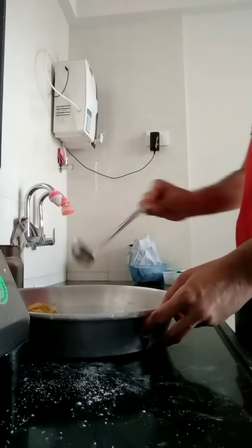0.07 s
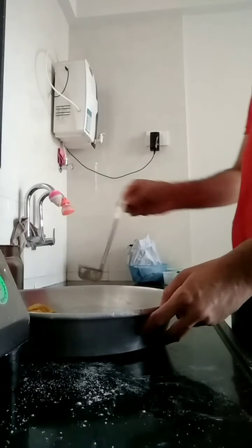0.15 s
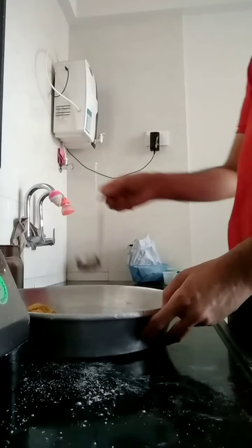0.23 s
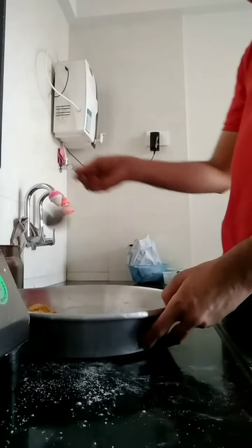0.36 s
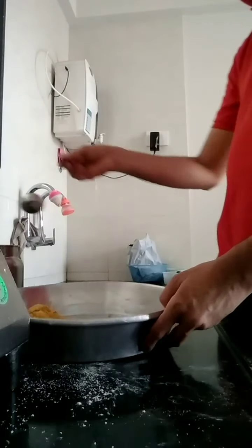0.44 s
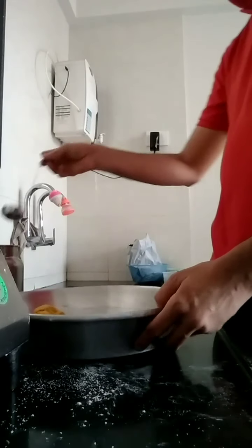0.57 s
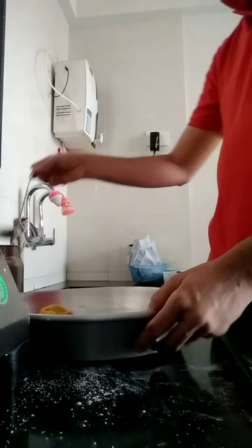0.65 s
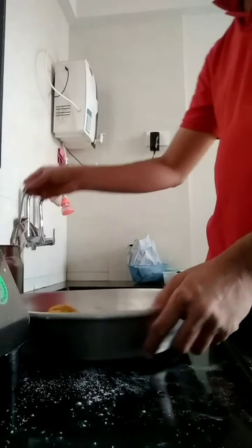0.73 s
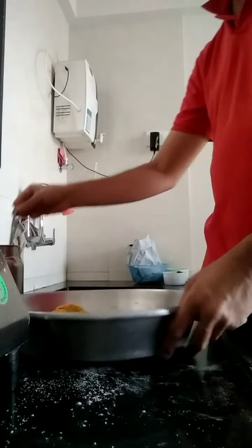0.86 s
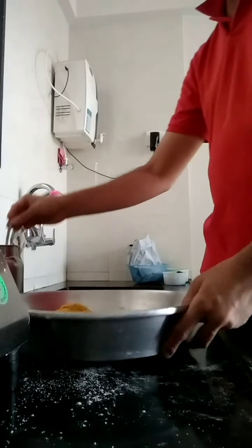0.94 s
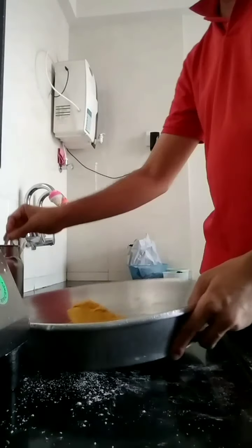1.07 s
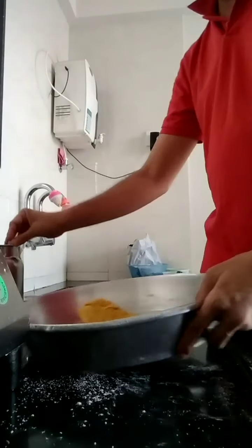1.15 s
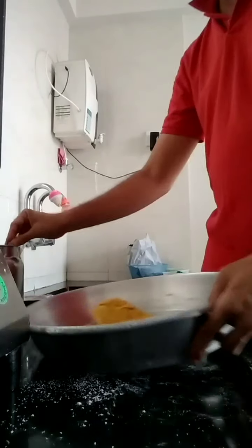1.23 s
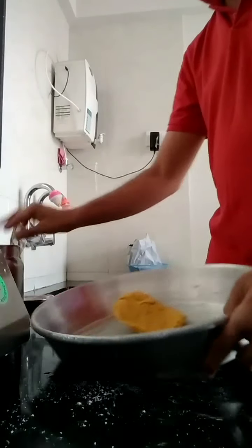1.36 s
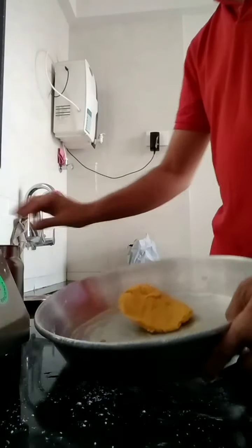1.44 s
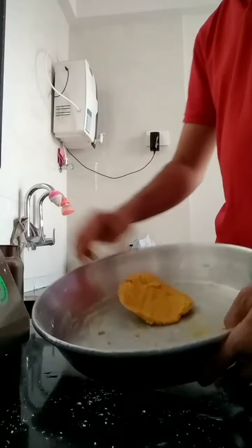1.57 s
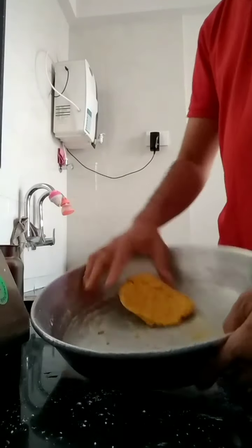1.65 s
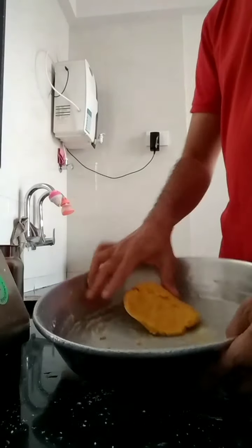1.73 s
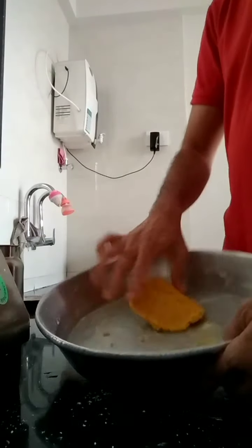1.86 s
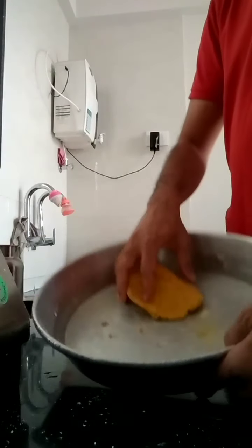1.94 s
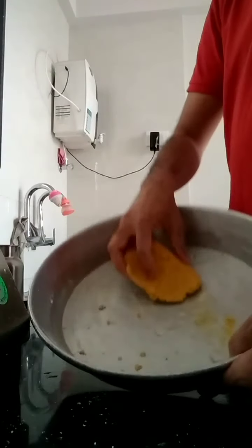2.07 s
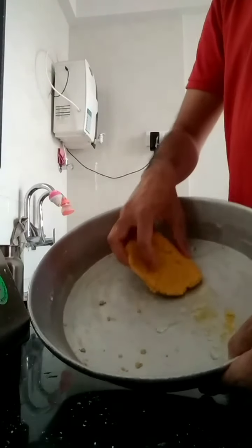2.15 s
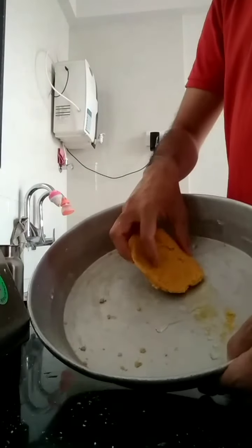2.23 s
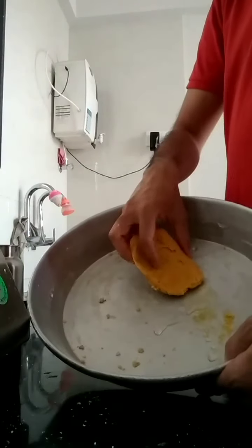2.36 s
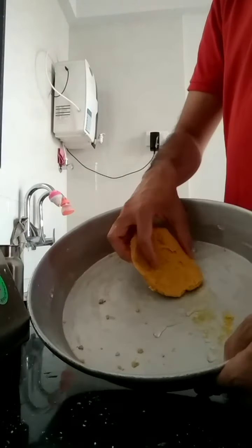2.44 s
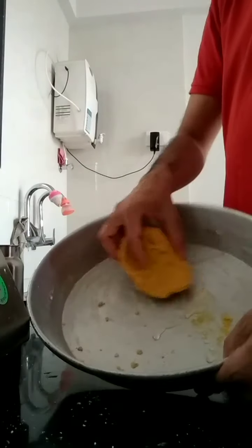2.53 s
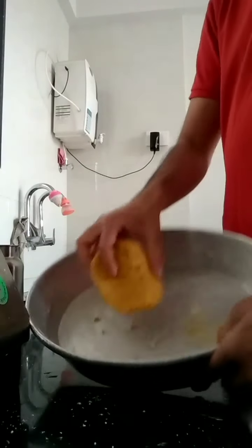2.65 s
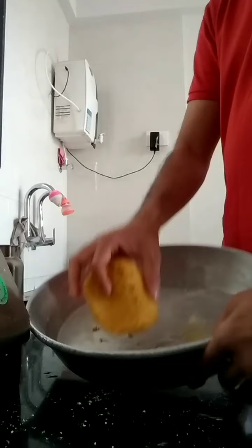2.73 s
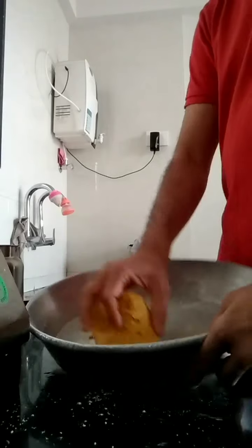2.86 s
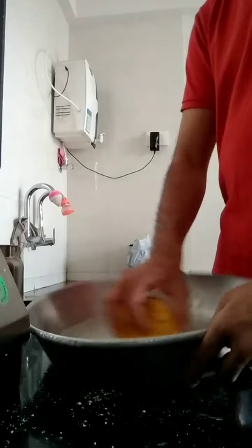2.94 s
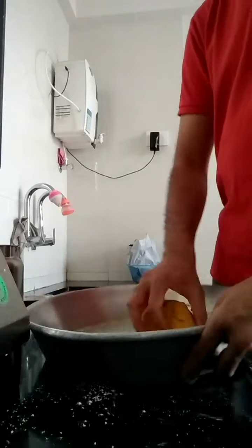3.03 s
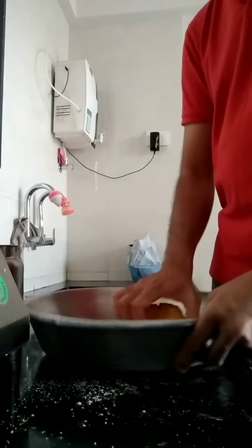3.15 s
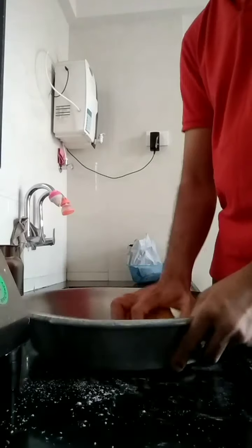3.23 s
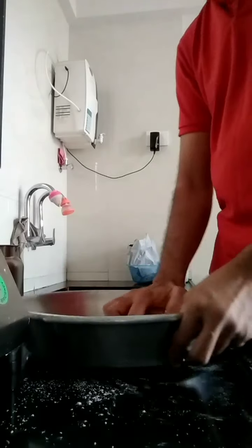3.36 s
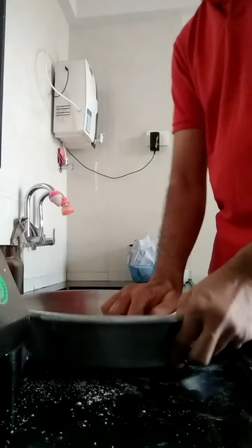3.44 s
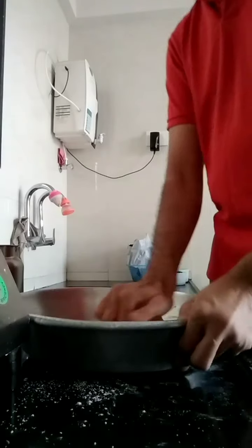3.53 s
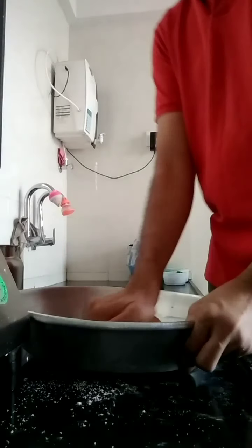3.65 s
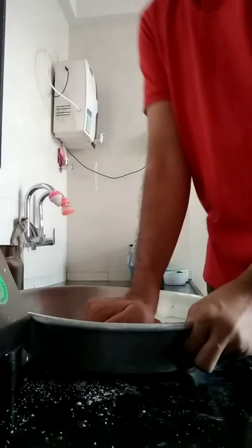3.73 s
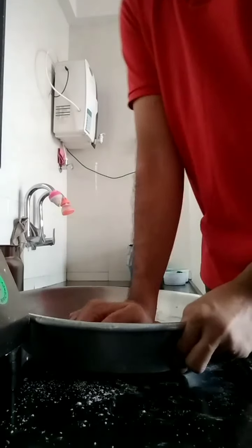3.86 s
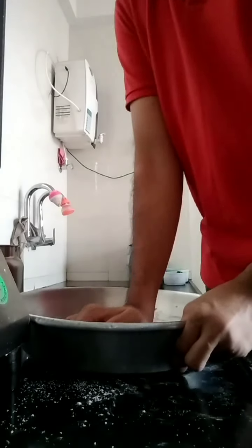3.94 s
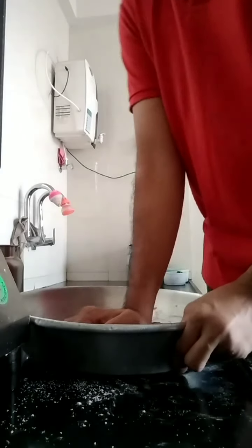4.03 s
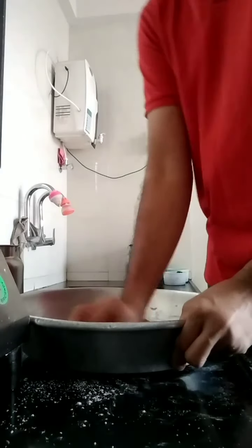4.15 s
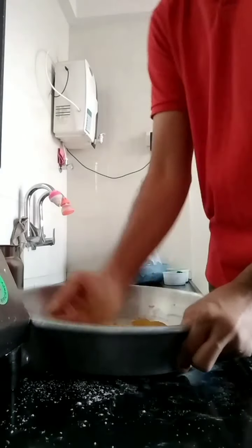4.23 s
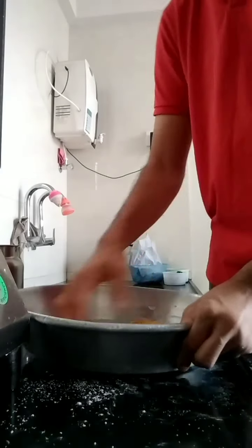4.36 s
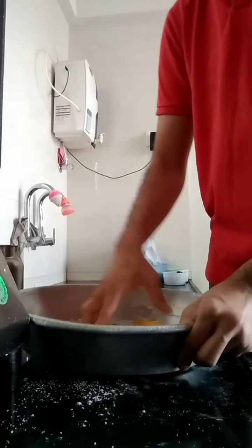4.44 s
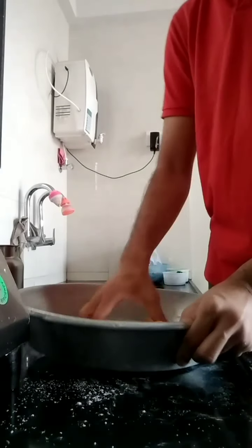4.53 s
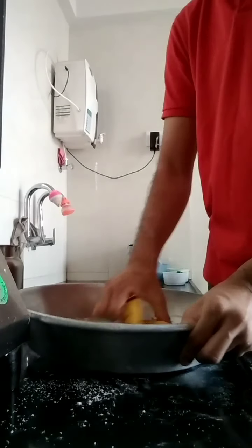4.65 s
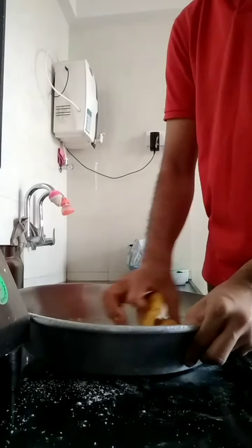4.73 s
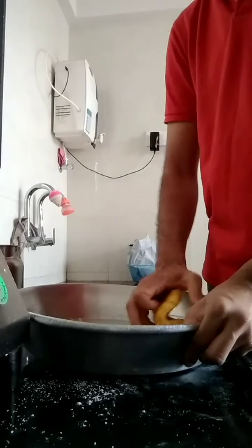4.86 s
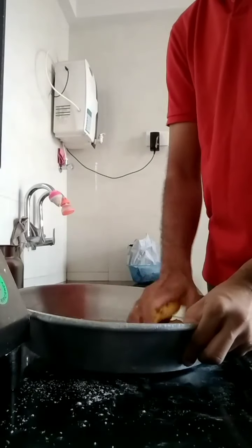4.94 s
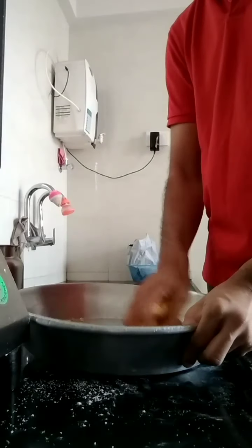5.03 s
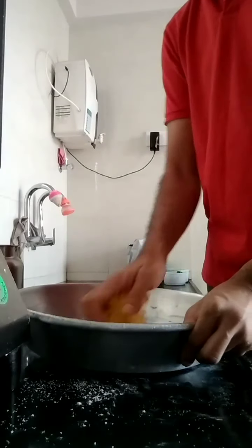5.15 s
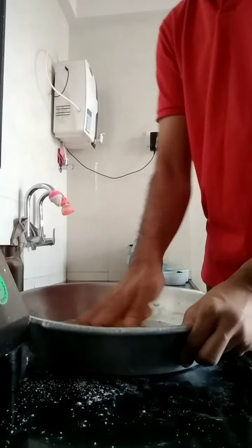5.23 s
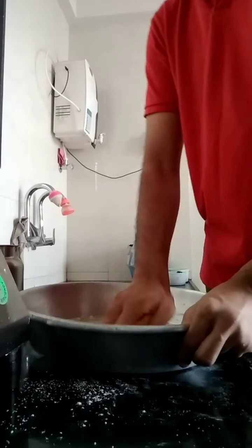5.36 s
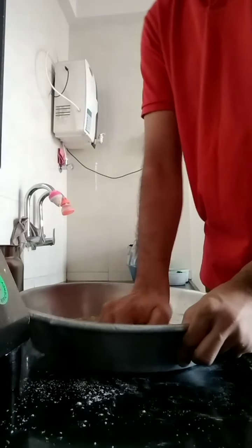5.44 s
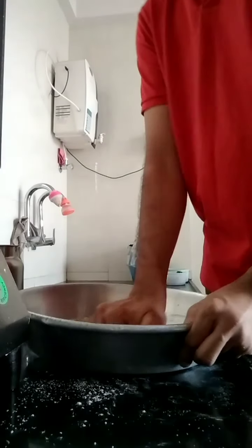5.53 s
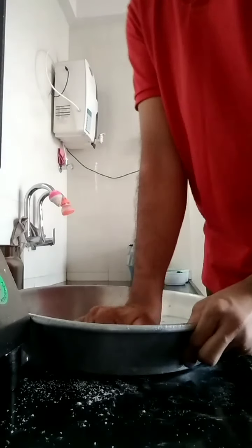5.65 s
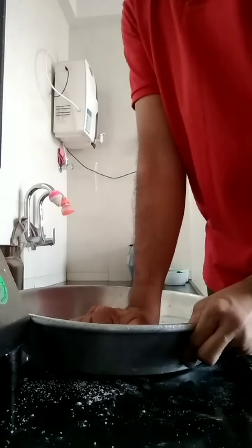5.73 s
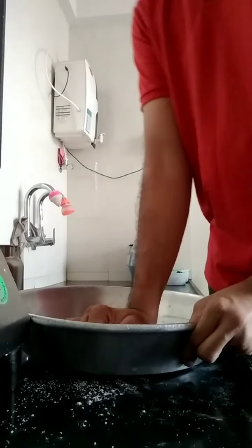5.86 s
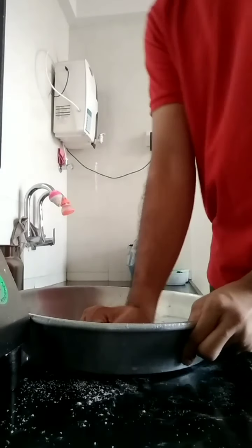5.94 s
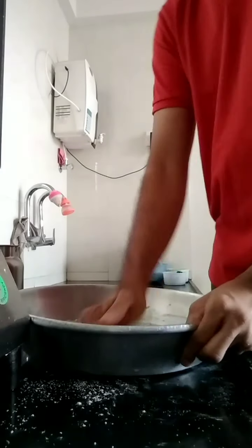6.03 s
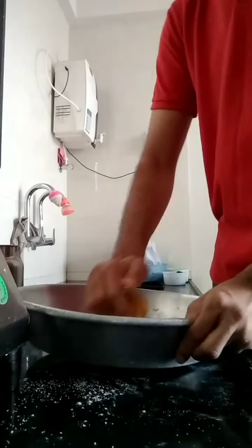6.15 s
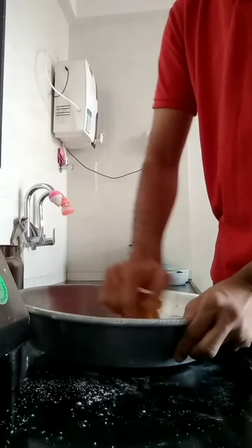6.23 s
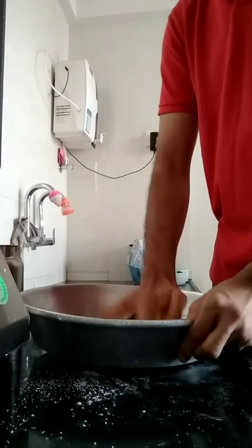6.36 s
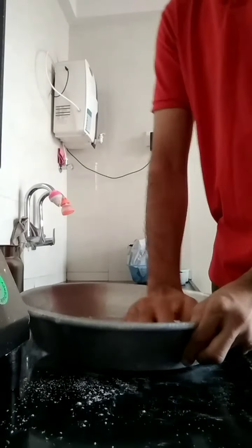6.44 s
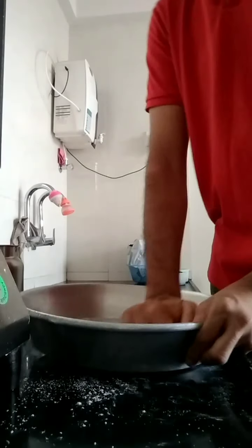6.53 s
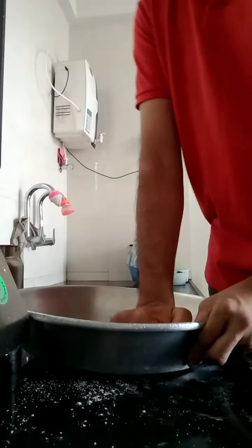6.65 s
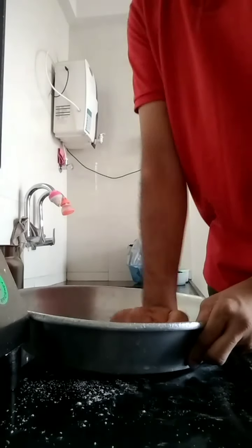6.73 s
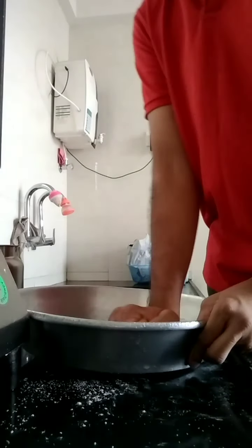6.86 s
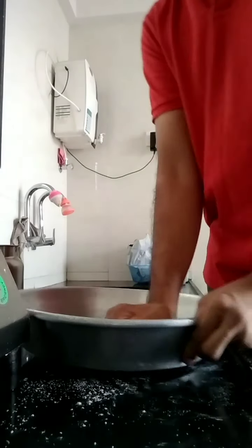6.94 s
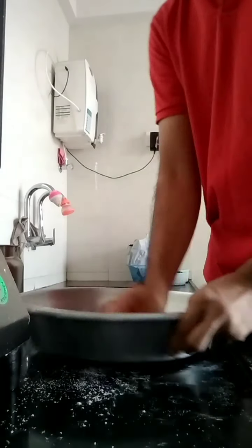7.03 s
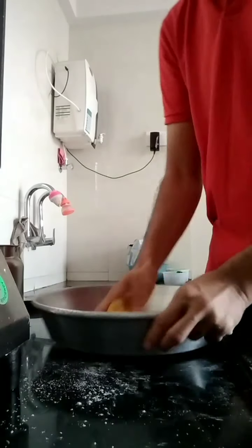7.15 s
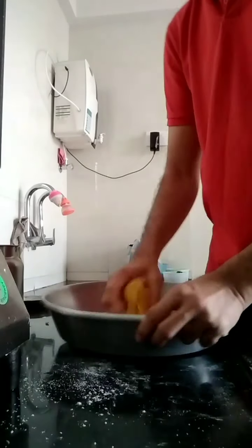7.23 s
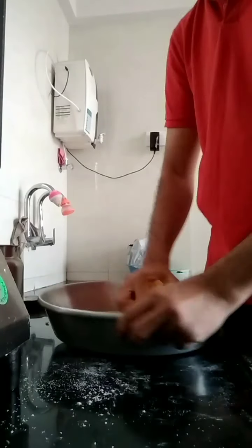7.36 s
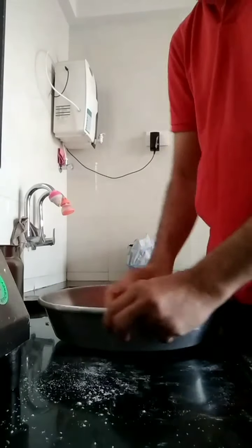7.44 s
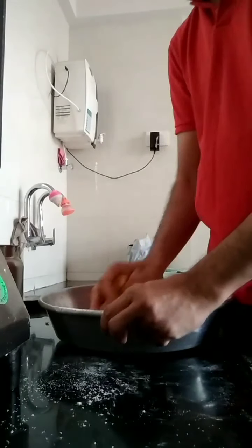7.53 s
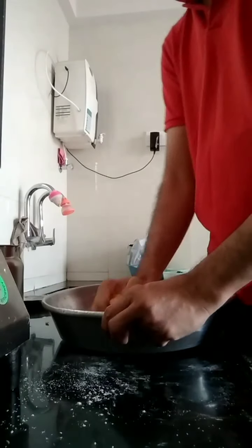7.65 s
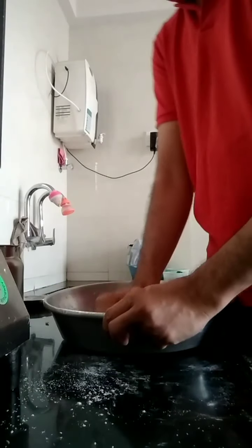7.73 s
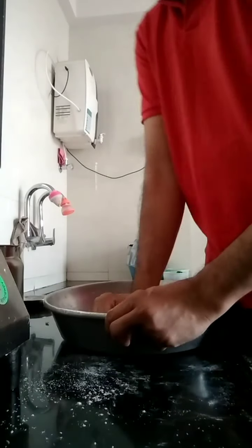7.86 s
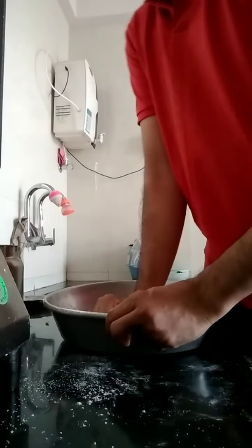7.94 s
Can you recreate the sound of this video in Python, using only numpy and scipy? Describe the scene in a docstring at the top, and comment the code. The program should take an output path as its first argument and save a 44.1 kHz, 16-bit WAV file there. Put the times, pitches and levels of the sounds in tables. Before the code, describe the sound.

A wide steel bowl knocks on stone, a ladle clinks, then dough is rubbed and pressed with squeaks, sticky snaps and two heavy metallic bangs.

```python
"""A wide steel bowl is knocked, rubbed and banged on a stone counter in a tiled kitchen; a ladle clinks early on.
A hand wipes a lump of dough round the bowl and leans on it until the steel bottom bangs on the stone.
Blows ring one set of damped modes plus a crack; the ladle beats in clusters of close modes; rubbing is
shaped noise and chirps; squeaks are gliding tones; slams, low thumps and snaps are bursts of coloured noise.
Decaying noise stands for the hard walls. Source levels are relative, ahead of the mix gains in scene()."""
import sys
import numpy as np
from scipy import signal
from scipy.fft import rfft, irfft
from scipy.io import wavfile
from scipy.ndimage import uniform_filter1d

SR = 44100
rng = np.random.default_rng(int(sys.argv[2]) if len(sys.argv) > 2 else 0)


def wav_record(signal):
    """Record a signal, one row per channel, as 16-bit PCM in the file named by sys.argv[1]."""
    frames = np.transpose(np.atleast_2d(signal))
    bounded = np.clip(frames, -1, 1)
    # unit amplitude maps onto the largest positive 16-bit level
    quanta = np.round(bounded * 32767).astype(np.int16)
    wavfile.write(sys.argv[1], SR, quanta)


N = 352359
T = np.arange(N) / SR
RING = T[:SR]  # one-second time axis of a single event


def undb(db):
    """Decibels to gain."""
    return 10 ** (np.asarray(db) / 20)


def unit(x):
    """Scale to rms 1."""
    return x / np.sqrt(np.mean(x ** 2))


def unit_hit(x):
    """Scale to the energy of 30 ms at rms 1."""
    return x / np.sqrt(np.sum(x ** 2) / (.03 * SR))


def fade(t60_s):
    """One second of exponential decay."""
    return np.exp(-np.log(1000) * RING / t60_s)


def onset(rise_s):
    """Exponential approach to full strength."""
    return 1 - np.exp(-RING / rise_s)


def colour(x, points):
    """Zero-phase filter by a spectrum of (frequency [Hz], level [dB]) points."""
    hz, db = np.transpose(points)
    f = np.fft.rfftfreq(x.shape[-1], 1 / SR)
    gain = undb(np.interp(np.log(f + 1), np.log(hz), db))
    return irfft(rfft(x) * gain, x.shape[-1])


def cut(x, hz, kind, order=3):
    """Causal high-pass or low-pass."""
    sos = signal.butter(order, min(hz, .45 * SR), kind, fs=SR, output="sos")
    return signal.sosfilt(sos, x)


def slow_noise(rate_hz):
    """Smoothed random steps at rate_hz, rms 1."""
    k = int(SR / rate_hz)
    steps = np.repeat(rng.standard_normal(N // k + 1), k)
    return unit(uniform_filter1d(steps, k)[:N])


def diffuse(size, apart_hz=1500):
    """Noise at two close microphones: alike in the bass, unrelated in the treble."""
    mid, side = rfft(rng.standard_normal((2, size)))
    angle = np.pi / 4 * np.tanh(np.fft.rfftfreq(size, 1 / SR) / apart_hz + .05)
    return irfft(np.cos(angle) * mid + np.sin(angle) * np.array([side, -side]), size)


def ports(x, lag_s=.00009):
    """Direct sound reaches the right microphone a moment before the left."""
    return np.array([np.interp(T - lag_s, T, x), x])


def add(track, s, sound):
    """Mix a sound into a track at s seconds."""
    i = int(s * SR)
    track[..., i:i + sound.shape[-1]] += sound[..., :track.shape[-1] - i]


def even(x, size=50):
    """Level out the chance peaks and dips in a noise's spectrum."""
    spectrum = rfft(x)
    power = uniform_filter1d(abs(spectrum) ** 2, size=size)
    return irfft(spectrum / np.sqrt(power), x.shape[-1])


def burst(points, decay_s):
    """A decaying rush of countless modes: noise with a smooth spectrum, faded twice."""
    noise = even(rng.standard_normal(len(RING)) * fade(decay_s))
    return colour(noise, points) * fade(4 * decay_s)


def bounces(gap_s, loss_db, t60_s, count=7):
    """Strength of a rattling contact: a first touch, then generally weaker ones at uneven intervals."""
    out, start_s, size = np.zeros(len(RING)), 0, 1
    for k, (gap, strength) in enumerate(rng.random((count, 2))):
        add(out, start_s, size * fade(t60_s))
        start_s += gap_s * (.5 + gap)
        size = undb(loss_db * (k + 2)) * (.5 + strength)
    return out


def rattle(points, contact):
    """Noise of many high modes with a smooth spectrum, excited as strongly as the contact goes."""
    noise = even(rng.standard_normal(len(RING)) * contact)
    return colour(noise, points) * np.clip(2 - 10 * RING, 0, 1)  # gone by 0.2 s


def ring(modes, weights, spread_s, bend=0, bend_s=0.085):
    """Decaying modes; bending waves bring each in at its own moment, and flexing bends their pitch."""
    out = 0
    for (hz, db, t60_s), weight in zip(modes, weights):
        age_s = np.maximum(RING[:SR // 2] - spread_s * rng.random(), 0)
        shift_s = bend * rng.uniform(-1.08, 1) * bend_s * (1 - np.exp(-age_s / bend_s))
        tone = np.sin(2 * np.pi * hz * (age_s + shift_s))
        decay = np.exp(-np.log(1000) * age_s / t60_s)
        out = out + weight * undb(db) / np.sqrt(t60_s) * tone * decay  # db is a mode's energy
    return np.pad(out, (0, len(RING) - len(out)))


def wander(x, depth_db, width_hz, hold_s, size=512):
    """Resonances about width_hz wide that swell and give way to others every hold_s."""
    spectra = signal.stft(x, nperseg=size)[2]
    field = rng.standard_normal(spectra.shape[-2:])
    for axis, cells in enumerate([width_hz * size / SR, hold_s * 2 * SR / size]):
        bell = np.exp(-(np.arange(-20, 21) / cells * 2) ** 2)
        field = np.apply_along_axis(np.convolve, axis, field, bell, "same")
    gain = undb(depth_db * np.tanh(unit(field) / 2) * 2)
    return unit(signal.istft(spectra * gain, nperseg=size)[1][..., :N])


def quiet_kitchen(level_db=-65):
    """Steady diffuse background noise whose level drifts slowly."""
    # background spectrum: (frequency [Hz], density [dB])
    background_points = [(15, -49.5), (25, -8.5), (76, -1), (145, -7), (185, -9), (326, -8.5), (439, -4),
                         (659, -18), (1160, -12), (1370, -32), (1560, -20.5), (1840, -28.5), (2910, -29.5),
                         (3340, -35), (16000, -46.5)]
    noise = unit(colour(diffuse(N), background_points))
    return undb(level_db) * noise * undb(.5 * slow_noise(4.2))


def kitchen(x, first_wall_s=0.00037):
    """Dense reflections from tiles: diffuse noise, each frequency band dying at its own rate."""
    # room: (frequency [Hz], t60 [s], reverberant energy relative to direct [dB])
    room_bands = [(70.4, 0.57, -0.5), (196, 0.57, -9), (490, 0.54, -8.5), (1470, 0.61, -8.5),
                  (2800, 0.7, -0.5), (5350, 0.56, -5), (10400, 0.46, -1.5), (16000, 0.34, -6)]
    hz, t60_s, wet_db = np.transpose(room_bands)
    noise = rfft(diffuse(len(RING)))
    f = np.log(np.fft.rfftfreq(len(RING), 1 / SR) + 1)
    tail = 0
    for band, band_t60_s in zip(np.eye(len(hz)), t60_s):
        tail = tail + irfft(noise * np.interp(f, np.log(hz), band)) * fade(band_t60_s)
    tail = colour(even(tail), list(zip(hz, wet_db)))  # many overlapping room modes share the energy evenly
    tail *= np.clip(RING / first_wall_s - .5, 0, 1) * np.clip(4 * (1 - RING), 0, 1)
    return signal.fftconvolve(np.atleast_2d(x), tail, axes=1)[:, :N]


def squeaks(waver=0.05, flutter_db=6):
    """Rim and fingers squeak as they slide: stick-slip tones with unsteady pitch and strength."""
    # squeaks: (time [s], length [s], start pitch [Hz], end pitch [Hz], level [dB])
    squeak_events = [(0.208, 0.079, 1183, 1223, -62.5), (.41, 0.044, 1155, 1114, -61),
                     (0.585, 0.16, 1600, 1555, -61), (0.724, 0.058, 1560, 1645, -52.5),
                     (3.241, 0.082, 1540, 1400, -51), (3.336, 0.032, 1383, 1480, -48.5),
                     (6.451, 0.043, 1635, 1570, -44.5), (7.5, 0.059, 1507, 1575, -46.5)]
    out, drift, flutter = np.zeros(N), slow_noise(260), undb(flutter_db * slow_noise(70))
    for s, length_s, start_hz, end_hz, db in squeak_events:
        span = slice(int(s * SR), int((s + length_s) * SR))
        u = np.linspace(0, 1, len(T[span]))
        hz = (start_hz + (end_hz - start_hz) * u) * (1 + waver * drift[span])
        tone = np.sin(2 * np.pi * np.cumsum(hz) / SR)
        add(out, s, undb(db) * unit(tone * np.sin(np.pi * u) * flutter[span]))
    return out


def ladle(chatter_db=-7.5, chatter_t60_s=0.0095, spread_s=0.011, push_s=0.00071, count=10):
    """The ladle bounces to rest: clusters of close modes beat against each other over a metallic chatter."""
    # touches: (time [s], level [dB], part that touches, nominal t60 [s])
    touches = [(0.783, -40, "handle", 0.022), (1.214, -26.5, "handle", 0.026), (1.463, -22.5, "cup", 0.12),
               (1.512, -29.5, "cup", 0.087)]
    # mode clusters by part: (centre [Hz], width [Hz], energy [dB])
    clusters = {"handle": [(2060, 390, -23), (2730, 120, -28.5), (3570, 600, -19.5), (4050, 120, -24),
                (4750, 160, -13), (5170, 300, -6.5), (5670, 200, -8), (5760, 160, -12), (6820, 290, -7.5),
                (7200, 350, -18), (8200, 160, -14.5), (8250, 60, -13), (9170, 310, -1), (9900, 150, -8),
                (10700, 320, -2.5), (11750, 550, -0.5), (12700, 600, -4.5), (13050, 200, -18),
                (13400, 450, -5), (15660, 120, -16)], "cup": [(477, 450, -3.5), (822, 230, -7.5),
                (1163, 49, -4.5), (1294, 150, -6.5), (1576, 62, 0.5), (2040, 310, -10.5),
                (2350, 300, -12.5), (2744, 290, -8), (3395, 360, -7.5), (4210, 200, -9.5), (4900, 290, -8),
                (5200, 370, -10), (5647, 130, -7), (6600, 520, -9), (7080, 410, -7.5), (7760, 270, -15),
                (8450, 250, -15), (9330, 580, -3), (10170, 44, -4), (10550, 700, -7), (11100, 330, -12),
                (12900, 1000, -1.5), (13715, 60, 2), (13600, 960, -2.5), (14550, 500, -2.5),
                (15550, 300, -15)]}
    # chatter spectrum: (frequency [Hz], level [dB])
    chatter_points = [(1000, 1.5), (4000, -13), (13500, 12), (15500, -9)]
    out = np.zeros(N)
    for s, db, part, t60_s in touches:
        modes = []
        for centre_hz, width_hz, mode_db in clusters[part]:
            for k in range(count):
                hz = centre_hz + width_hz * ((k + rng.random()) / count - .5)
                modes.append((hz, mode_db, t60_s * (.5 + rng.random())))
        contact = bounces(gap_s=.009, loss_db=-5, t60_s=chatter_t60_s)
        tones = unit_hit(ring(modes, np.ones(len(modes)), spread_s))
        clink = tones + undb(chatter_db) * unit_hit(rattle(chatter_points, contact))
        lowest_hz = clusters[part][0][0]
        add(out, s, undb(db) * unit_hit(cut(clink * onset(push_s), lowest_hz, "high")))
    return out


def stroke_strength(length_s, attack_s, ease_db_per_s, release_db_per_s):
    """Strength of one stroke: a smooth rise, a sagging hold and a release."""
    age_s = RING - attack_s
    hold_db = ease_db_per_s * np.clip(age_s, 0, length_s)
    release_db = release_db_per_s * np.maximum(age_s - length_s, 0)
    return np.minimum(RING / attack_s, 1) ** 2 * undb(-hold_db - release_db)


def dough_slips(per_s=900, cycles=8, scatter_db=3.5, glide=0.088):
    """Sticky dough lets go in little jerks, each a short gliding chirp of the bowl's wall."""
    out = np.zeros(N)
    for when, pitch, size, bend in rng.random((int(per_s * N / SR), 4)):
        hz = 80 + 2400 * pitch
        age = RING[:int(4 * cycles / hz * SR)] * hz / cycles  # in units of `cycles` periods
        chirp = np.sin(2 * np.pi * cycles * age * (1 + glide * (bend - .5) * age)) * np.sqrt(hz)
        strength = undb(-scatter_db * np.log(size + 0.015))
        add(out, when * T[-1], strength * age * np.exp(-age * 2) * chirp)
    return out


def rubbing(grain_db=1, slip_db=2, hiss_gain_db=1, crackle_per_s=320, crackle_scatter_db=3.0, crackle_db=-7.5):
    """Skin hisses over steel, dough crackles as it peels and drags in jerks; returns hiss and drag."""
    # strokes of palm and dough: (time at full speed [s], length [s], skin hiss [dB], dough drag [dB])
    strokes = [(0.677, 0.04, -62, -78.5), (0.744, 0.04, -54.5, -69.5), (0.807, 0.012, -60, -73),
               (0.909, 0.098, -52.5, -88.5), (1.081, 0.23, -54, -58.5), (1.13, 0.17, -63, -45),
               (1.393, 0.2, -59, -56), (1.666, 0.13, -50.5, -57.5), (2.02, 0.076, -69.5, -93),
               (2.096, 0.0061, -44.5, -40.5), (2.478, 0.0049, -68, -82), (2.59, 0.063, -70.5, -67),
               (3, 0.062, -47, -46.5), (3.108, 0.15, -43.5, -47), (3.297, 0.072, -57.5, -78),
               (3.421, 0.078, -68, -76.5), (3.572, 0.015, -72, -58.5), (3.757, 0.015, -52.5, -48.5),
               (3.905, 0.022, -102.5, -64), (4.02, 0.052, -71.5, -60), (4.239, 0.031, -63, -61),
               (4.344, 0.028, -60.5, -54), (4.521, 0.026, -48.5, -50.5), (4.544, 0.07, -61.5, -48),
               (4.671, 0.0059, -35, -40), (4.813, 0.086, -82, -55.5), (4.945, 0.048, -59, -68.5),
               (5.043, 0.16, -46, -52), (5.282, 0.054, -50.5, -45.5), (5.367, 0.021, -48.5, -68),
               (5.626, 0.1, -55.5, -56), (6.059, 0.15, -54.5, -46), (6.242, 0.095, -59.5, -63),
               (6.346, 0.083, -67, -55), (6.489, 0.056, -45.5, -45), (6.598, 0.065, -52, -77.5),
               (6.935, 0.11, -49.5, -44.5), (7.106, 0.13, -44.5, -52.5), (7.29, 0.052, -48.5, -54),
               (7.417, 0.058, -52.5, -55.5), (7.524, 0.076, -53.5, -51.5), (7.662, 0.064, -58, -72),
               (7.947, 0.036, -70, -64.5)]
    # skin hiss spectrum: (frequency [Hz], level [dB])
    hiss_points = [(1300, -36), (2200, -29.5), (2700, -17.5), (3300, -3), (4300, -2), (5300, 3),
                   (7000, 0.5), (8500, 4), (10500, 8.5), (12500, 4.5), (14700, 6.5), (16000, 0.5)]
    # dough drag spectrum: (frequency [Hz], level [dB])
    drag_points = [(60, 2), (120, -17.5), (260, -13), (400, -17.5), (530, -6), (740, 0), (900, -3),
                   (1060, -1), (1250, -3), (1540, -4.5), (1780, -22), (2050, -7), (2500, -18.5),
                   (3400, -22.5)]
    hiss_attack_s, hiss_ease_db_per_s, hiss_release_db_per_s = 0.067, 9, 281
    drag_attack_s, drag_ease_db_per_s, drag_release_db_per_s = 0.068, 41.5, 303.5
    hiss_level, drag_level = np.zeros(N), np.zeros(N)
    for s, length_s, hiss_db, drag_db in strokes:
        palm = stroke_strength(length_s, hiss_attack_s, hiss_ease_db_per_s, hiss_release_db_per_s)
        lump = stroke_strength(length_s, drag_attack_s, drag_ease_db_per_s, drag_release_db_per_s)
        add(hiss_level, s - hiss_attack_s, undb(hiss_db) * palm)
        add(drag_level, s - drag_attack_s, undb(drag_db) * lump)
    skin = unit(diffuse(N) * undb(grain_db * slow_noise(1500)))
    ticks = rng.random(N) < crackle_per_s / SR
    crackle = unit(ticks * undb(crackle_scatter_db * rng.standard_normal(N)))
    friction = (skin + undb(crackle_db) * ports(crackle)) * undb(slip_db * slow_noise(49))
    # broad resonances in hiss and drag swell and fade at random
    hiss = wander(colour(friction, hiss_points), depth_db=4.5, width_hz=160, hold_s=0.049)
    drag = wander(colour(dough_slips(), drag_points), depth_db=4.5, width_hz=140, hold_s=0.04)
    return hiss * hiss_level * undb(hiss_gain_db), drag * drag_level


def thumps_and_snaps(thump_decay_s=0.22, thump_rise_s=0.003, snap_gap_s=0.0045, snap_loss_db=-3.5, snap_t60_s=0.0078):
    """Dull low noise bursts, and sticky dough snapping off steel or fingers in short tick runs; returns both."""
    # low thumps: (time [s], level [dB])
    thump_events = [(1.105, -42), (1.79, -51.5), (3.079, -44.5), (5.279, -48)]
    # thump spectrum: (frequency [Hz], level [dB])
    thump_points = [(40, -23.5), (75, -1.5), (115, 3.5), (170, -13), (300, -21), (800, -60)]
    # snaps of sticky dough: (time [s], level [dB])
    snap_events = [(2.451, -55.5), (2.612, -65), (2.688, -57), (3.081, -49), (3.555, -59.5), (3.748, -54),
                   (4.465, -57.5), (4.505, -57), (4.925, -61.5), (5.06, -51), (5.354, -46), (6.205, -54.5),
                   (6.299, -51.5), (6.322, -51.5), (6.415, -56.5), (6.549, -46), (7.096, -42), (7.308, -37)]
    # snap spectrum: (frequency [Hz], level [dB])
    snap_points = [(600, -27.5), (1500, -3.5), (2300, -8.5), (3300, 0.5), (6000, -6), (10500, 6.5),
                   (15000, 5)]
    thumps, snaps = np.zeros(N), np.zeros(N)
    for s, db in thump_events:
        add(thumps, s, undb(db) * unit_hit(burst(thump_points, thump_decay_s) * onset(thump_rise_s)))
    for s, db in snap_events:
        contact = bounces(snap_gap_s, snap_loss_db, snap_t60_s)
        add(snaps, s, undb(db) * unit_hit(rattle(snap_points, contact)))
    return thumps, snaps


def slams(clap_gap_s=0.0016, clap_loss_db=-2.0, clap_t60_s=0.014,
          rock_after_s=0.02, rock_gap_s=0.016, rock_loss_db=-2, rock_db=-12,
          thud_decay_s=0.21, thud_rise_s=0.0026):
    """The bowl's edge, then twice its flat bottom, claps on stone and rattles; returns clap and low thud."""
    # slams: (time [s], clap [dB], thud [dB])
    slam_events = [(2.0903, -18.5, -28), (5.67, -14, -20.5), (6.6616, -13.5, -16)]
    # clap spectrum: (frequency [Hz], level [dB])
    clap_points = [(200, -11), (480, 1), (850, -28), (1075, 11.5), (1260, -2), (1450, 2), (1580, 8.5),
                   (1730, -17.5), (1920, -7.5), (2170, -8), (2400, -27.5), (6000, -22), (15000, -36)]
    # thud spectrum: (frequency [Hz], level [dB])
    thud_points = [(45, -31), (62, -7.5), (78, 2), (115, -6.5), (155, -4), (195, 7.5), (300, -5.5),
                   (480, -1.5), (800, -4.5), (2000, -47.5)]
    clap, thud = np.zeros(N), np.zeros(N)
    for s, clap_db, thud_db in slam_events:
        contact = bounces(clap_gap_s, clap_loss_db, clap_t60_s)
        rocking = bounces(rock_gap_s, rock_loss_db, clap_t60_s)
        add(contact, rock_after_s, undb(rock_db) * rocking)
        add(clap, s, undb(clap_db) * unit_hit(rattle(clap_points, contact)))
        add(thud, s, undb(thud_db) * unit_hit(burst(thud_points, thud_decay_s) * onset(thud_rise_s)))
    return clap, cut(thud, 62, "high", order=4)


def bowl(crack_decay_s=0.032, spread_s=0.007066, place_width=0.14, push_cycles=4,
         crack_reach=3.5, detune=0.0053, lowest_hz=58, flex=0.007):
    """Each blow drives a band of the bowl's modes, favours some by the place struck, and adds a crack."""
    # blows: (time [s], level [dB], lowest driven [Hz], highest driven [Hz],
    #         favoured by the place struck [Hz], its boost [dB], contact crack relative to body [dB])
    blows = [(.121, -53.5, 880, 1660, 1074, 6, -35), (.555, -41.5, 340, 570, 497, 25, -24),
             (.80, -44, 258, 430, 383, 17, -42), (1.129, -13.5, 326, 980, 520, 16.5, -64),
             (1.143, -17.5, 437, 885, 504, 17.5, -63), (1.65, -29, 304, 1340, 399, 11.5, -15),
             (1.677, -34.5, 292, 640, 422, 9, -45), (1.712, -39.5, 500, 1300, 1150, 24, -30),
             (1.75, -49, 390, 1390, 1080, 18, -24), (1.832, -66, 330, 560, 438, 15, -45),
             (1.996, -48.5, 495, 880, 735, 13, -69), (2.0887, -17.5, 170, 1500, 647, 8.5, -18),
             (2.146, -22, 337, 530, 445, 22, -50), (2.30, -41, 364, 540, 450, 24, -48),
             (2.385, -45, 360, 540, 445, 26, -52.5), (2.612, -50.5, 335, 1000, 386, 9, -11.5),
             (2.684, -38, 536, 1740, 660, 11.5, -16), (2.76, -48, 306, 850, 340, -5, -39),
             (2.906, -23, 500, 935, 690, 10, -32.5), (2.909, -27.5, 355, 600, 447, 27, -57),
             (2.985, -29, 393, 550, 446, 27, -46), (3.078, -34, 467, 1400, 704, 5, -13),
             (3.703, -40, 430, 1990, 515, 14, -9.5), (3.747, -42.5, 420, 1880, 596, 12, -15),
             (4.194, -51.5, 324, 905, 400, 6.5, -12), (4.316, -43, 690, 1140, 850, 25, -41),
             (4.389, -41, 630, 1140, 720, 19, -30), (4.477, -44, 610, 905, 690, 23, -35),
             (4.51, -41, 600, 1400, 770, 22, -37), (4.658, -30, 700, 2000, 1230, 10.5, -6),
             (4.84, -46, 298, 700, 377, 24, -42), (5.03, -41.5, 830, 2400, 1600, 9, 0),
             (5.254, -31.5, 510, 2090, 540, 10, -22), (5.351, -38.5, 704, 2020, 1080, 4, -15.5),
             (5.6706, -20.5, 166, 2680, 1590, -3, 1), (6.6637, -20, 174, 2800, 1100, 0.5, 3),
             (7.165, -47, 198, 344, 248.6, 39, 1), (7.306, -41.5, 86.5, 1050, 686, 8.5, -22.5)]
    # bowl damped by dough and hand: (nominal frequency [Hz], energy [dB], t60 [s])
    bowl_modes = [(80, -6, 0.18), (109, -8, 0.17), (195, 0.5, 0.068), (221, -3, 0.068), (280.7, -1, 0.06),
                  (385, -2, 0.09), (444.2, -0.5, 0.081), (517, -2.5, 0.054), (571, -5, 0.18),
                  (657.3, -9, 0.18), (707.4, -4, 0.08), (790.6, -8, 0.1), (904, -6.5, 0.06),
                  (1082, 3.5, 0.026), (1173, -4, 0.036), (1342, -10.5, 0.086), (1430, -4.5, 0.06),
                  (1590, -1, 0.039), (1924, -4, 0.03), (2086, -7, 0.067)]
    # steel cracking on stone: (frequency [Hz], level [dB])
    crack_points = [(300, -20.5), (1500, 8), (2200, -4), (2500, -3.5), (3100, -2), (4400, -5), (5600, 3),
                    (7200, -4), (10200, 2.5), (13000, 2.5), (16000, 8.5)]
    out = np.zeros(N)
    for s, db, low_hz, high_hz, place_hz, place_db, crack_db in blows:
        softness = undb(-.4 * (db + 25.0))  # gentle blows build up more slowly and their contact lasts longer
        push = onset(push_cycles / high_hz * softness)
        modes = np.array(bowl_modes, float)
        nearness = np.exp(-(np.log(modes[:, 0] / place_hz) / place_width) ** 2)
        weights = undb(place_db * nearness)
        # the hand loads the bowl differently each time
        modes[:, 0] *= 1 + detune * rng.uniform(-0.33, 1, len(modes))
        body = cut(ring(modes, weights, spread_s, flex), low_hz, "high")
        body = cut(body, high_hz, "low", order=4)
        crack = cut(burst(crack_points, crack_decay_s * softness), crack_reach * high_hz, "low", order=2)
        add(out, s, undb(db) * (unit_hit(body * push) + undb(crack_db) * unit_hit(crack * push)))
    return cut(out, lowest_hz, "high", order=4)  # the bowl is too small to radiate deep bass


def scene():
    """Bowl, ladle and hand, heard directly and off the walls, over the quiet kitchen."""
    # left microphone faces the work: (frequency [Hz], left minus right [dB])
    facing = [(100, -0.5), (250, -0.5), (560, 1.5), (1100, 7), (1800, 6), (4000, 2), (8000, 5),
              (13000, -0.4)]
    hiss, drag = rubbing()
    clap, thud = slams()
    thumps, snaps = thumps_and_snaps()
    body = bowl() + ladle() + squeaks() + thud + thumps
    near = undb(-9.5) * (body + clap) + undb(-3.0) * drag + undb(-10) * snaps
    direct = ports(near) + hiss  # hiss is already stereo
    walls = kitchen(body + undb(-7.0) * clap + drag + undb(-5.0) * (hiss + snaps))
    left, right = direct + walls + quiet_kitchen()
    left = colour(left, [(hz, db / 2) for hz, db in facing])
    right = colour(right, [(hz, -db / 2) for hz, db in facing])
    return np.array([left, right])


def record(dry, top_hz=15850):
    """A steep elliptic low-pass cuts the top."""
    return signal.sosfilt(signal.ellip(10, .2, 80, top_hz, fs=SR, output="sos"), dry)


dry = scene()
out = record(dry)
wav_record(out)
```